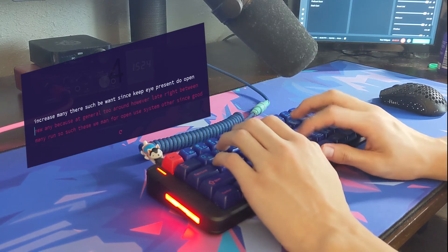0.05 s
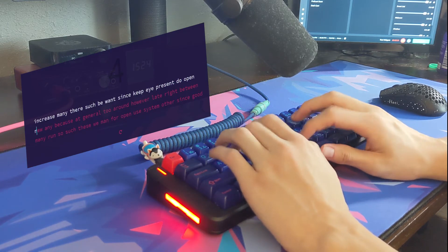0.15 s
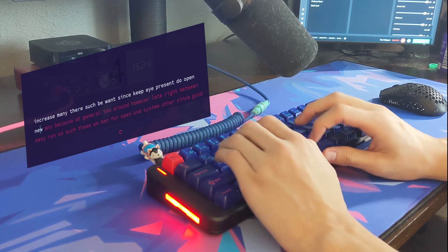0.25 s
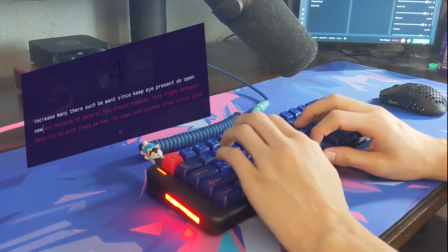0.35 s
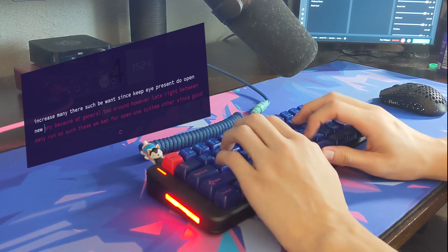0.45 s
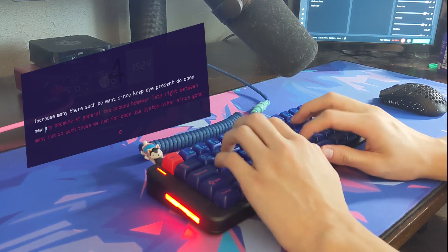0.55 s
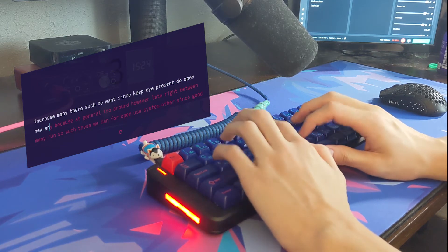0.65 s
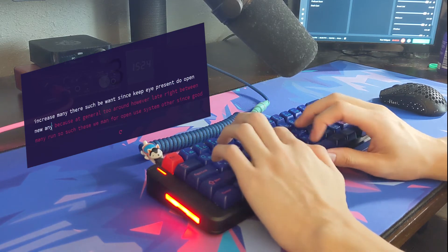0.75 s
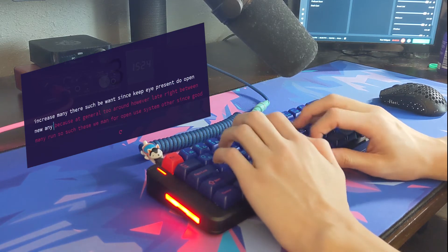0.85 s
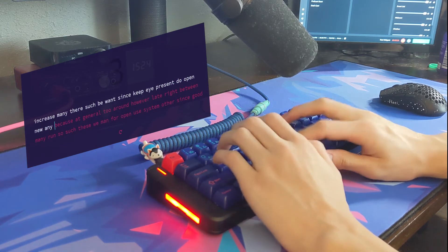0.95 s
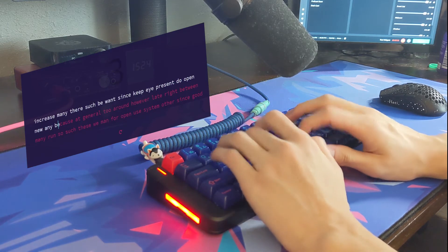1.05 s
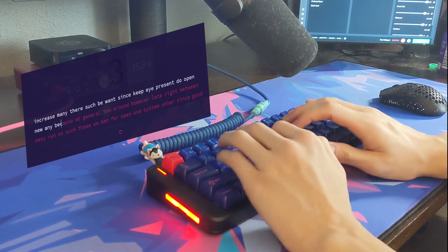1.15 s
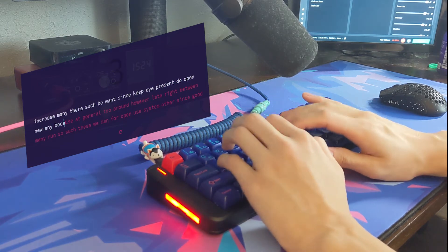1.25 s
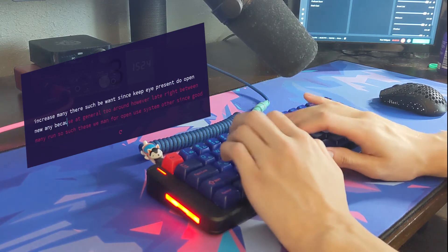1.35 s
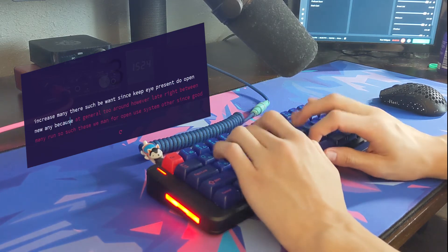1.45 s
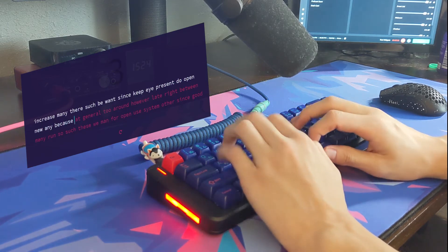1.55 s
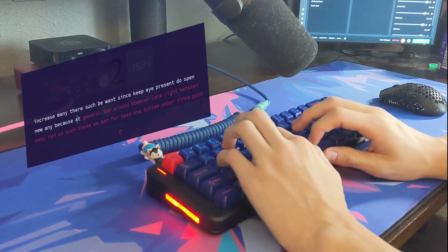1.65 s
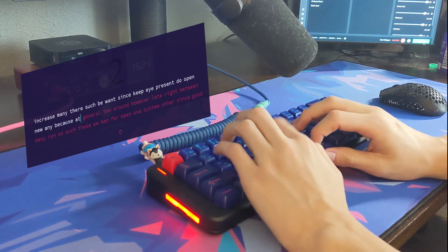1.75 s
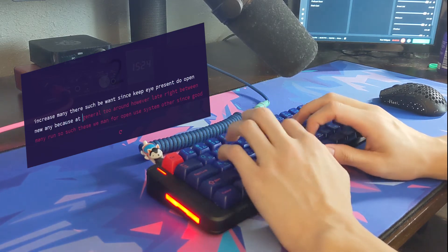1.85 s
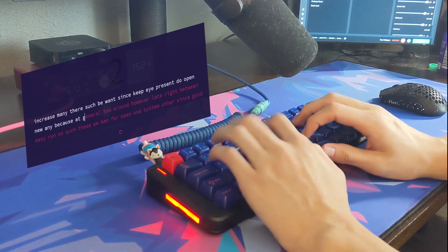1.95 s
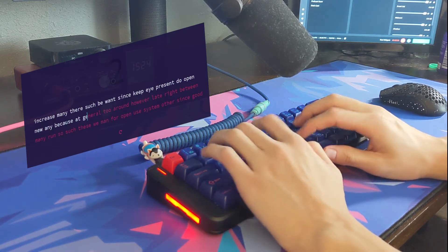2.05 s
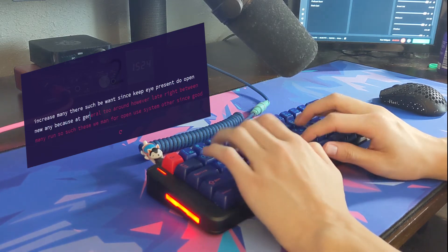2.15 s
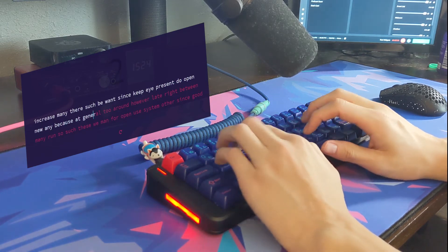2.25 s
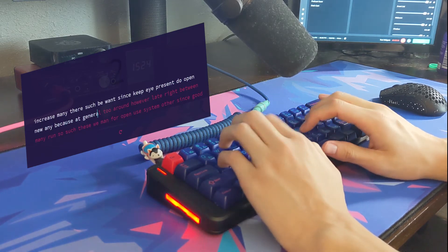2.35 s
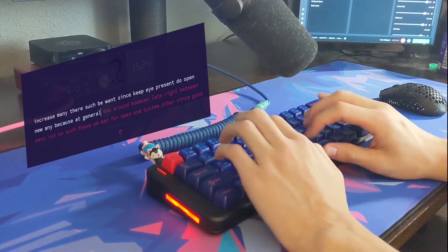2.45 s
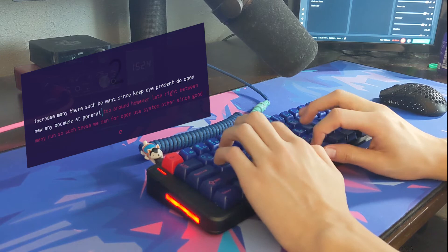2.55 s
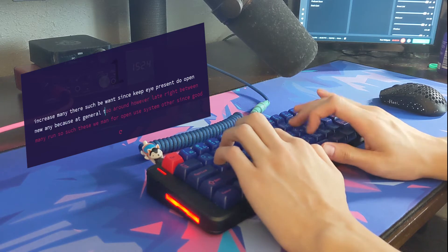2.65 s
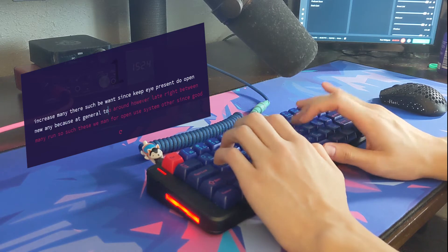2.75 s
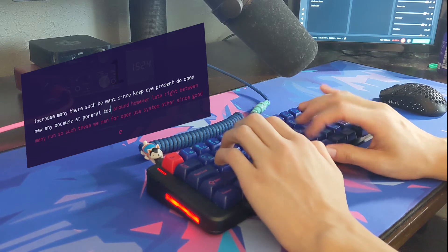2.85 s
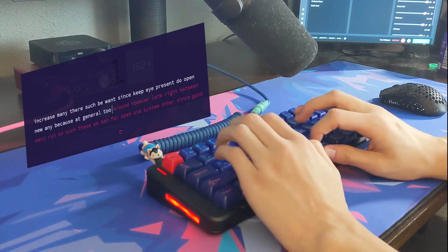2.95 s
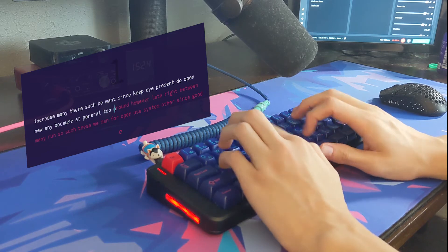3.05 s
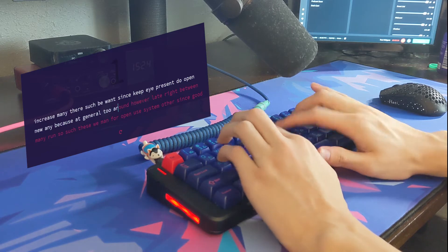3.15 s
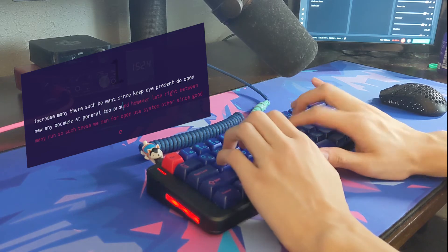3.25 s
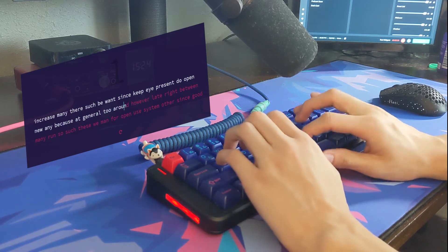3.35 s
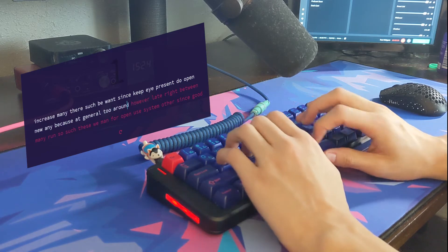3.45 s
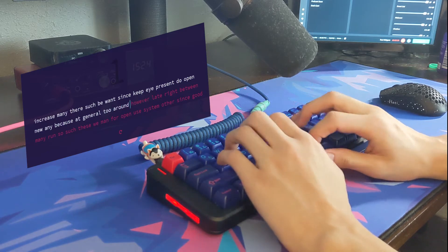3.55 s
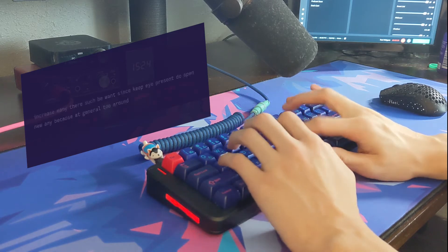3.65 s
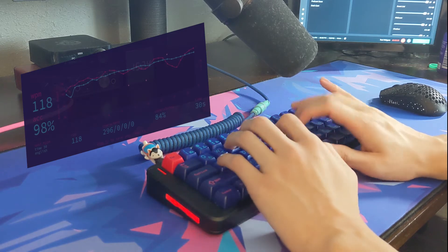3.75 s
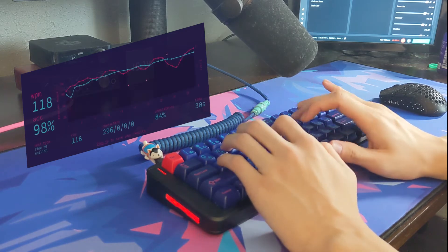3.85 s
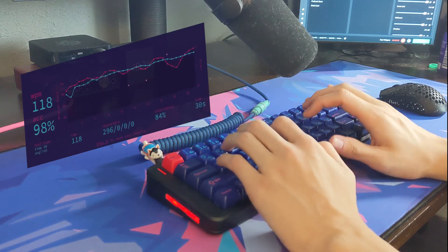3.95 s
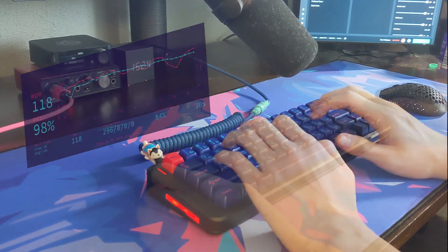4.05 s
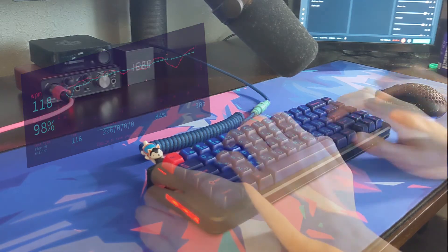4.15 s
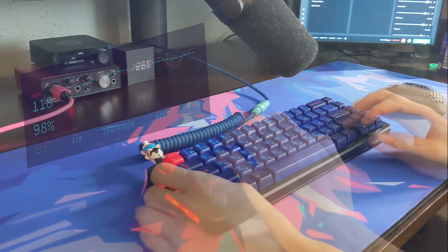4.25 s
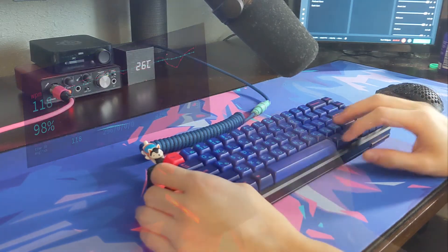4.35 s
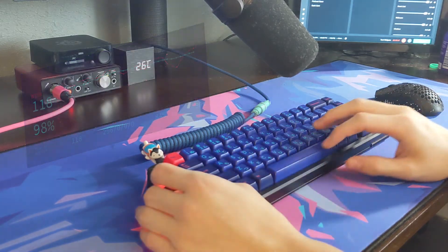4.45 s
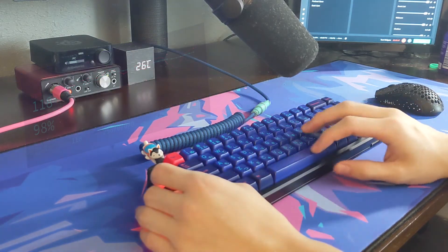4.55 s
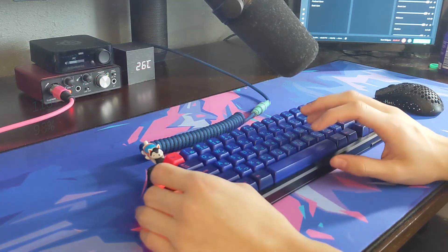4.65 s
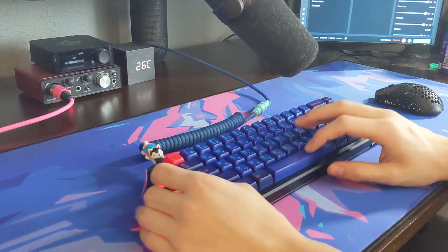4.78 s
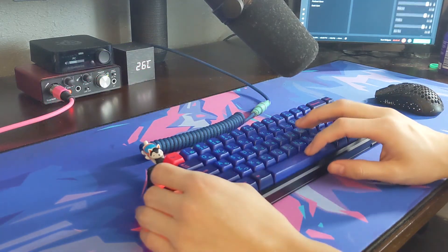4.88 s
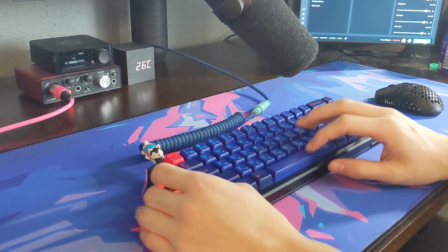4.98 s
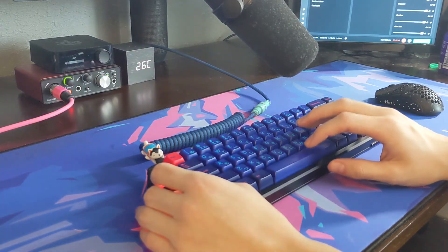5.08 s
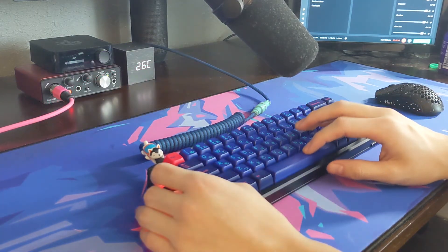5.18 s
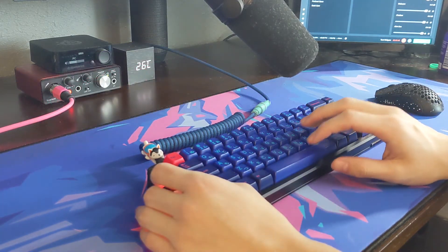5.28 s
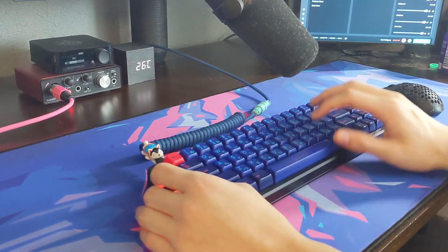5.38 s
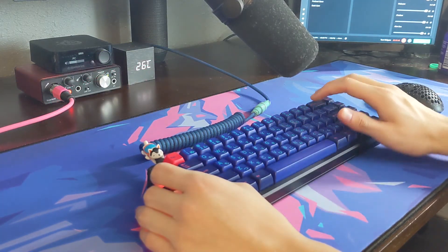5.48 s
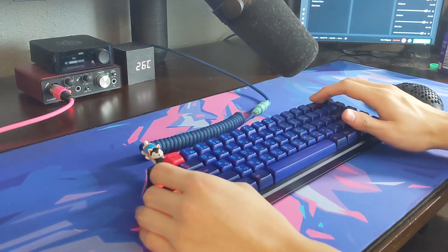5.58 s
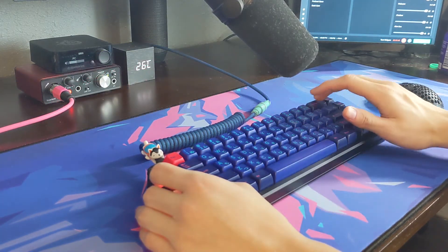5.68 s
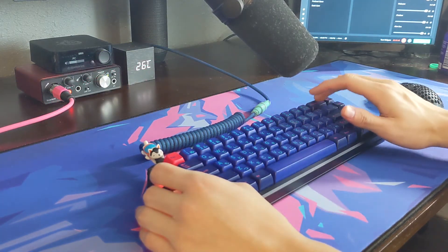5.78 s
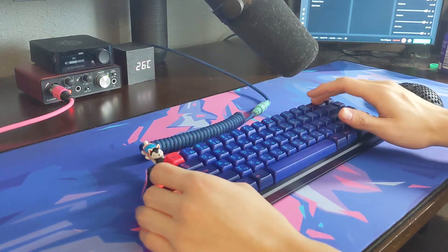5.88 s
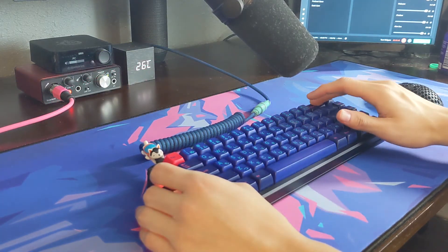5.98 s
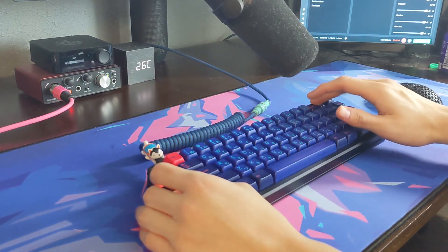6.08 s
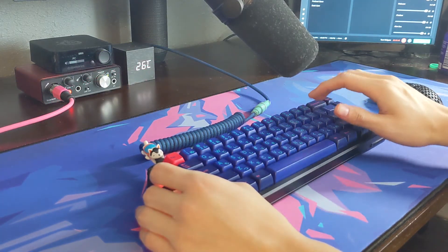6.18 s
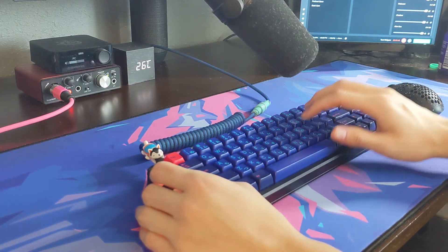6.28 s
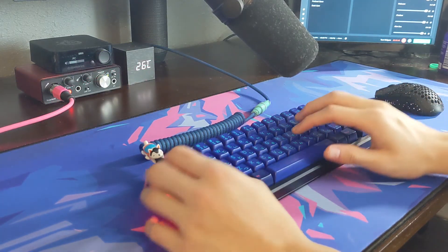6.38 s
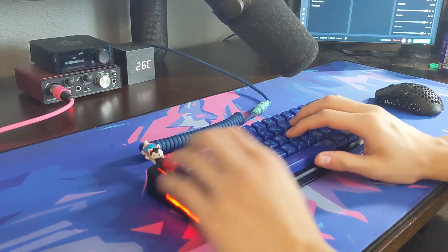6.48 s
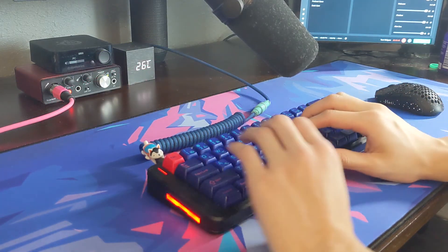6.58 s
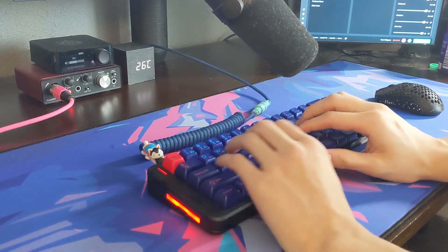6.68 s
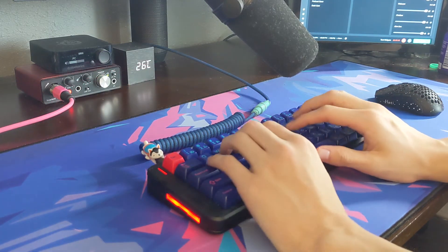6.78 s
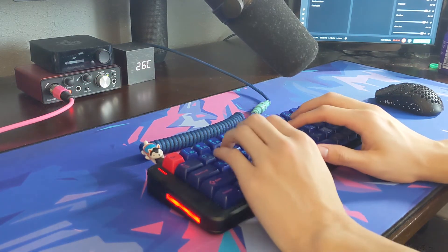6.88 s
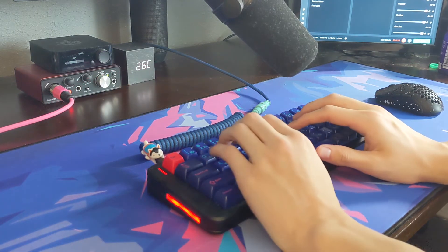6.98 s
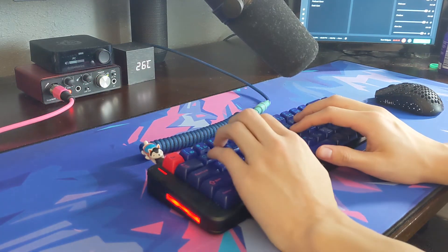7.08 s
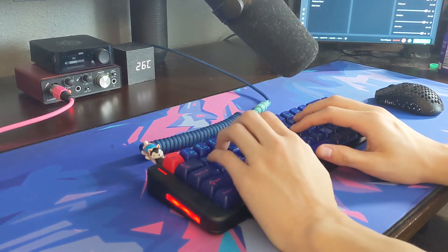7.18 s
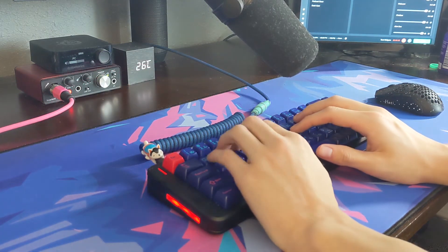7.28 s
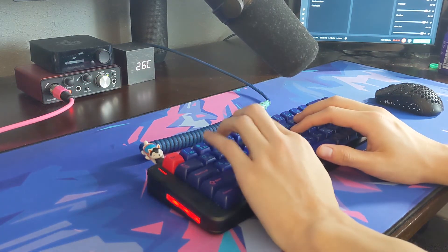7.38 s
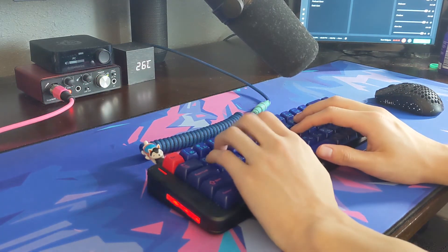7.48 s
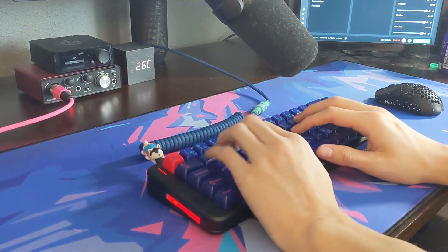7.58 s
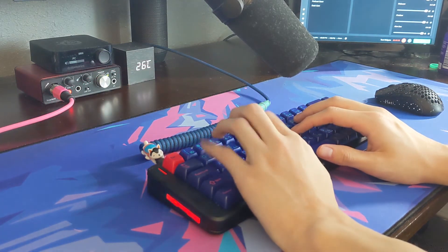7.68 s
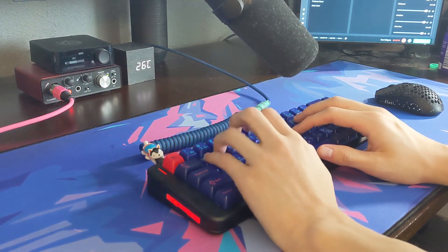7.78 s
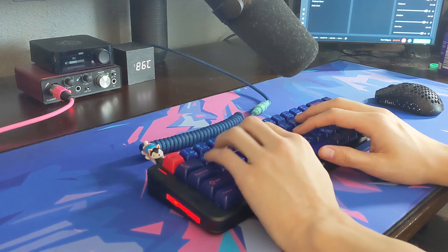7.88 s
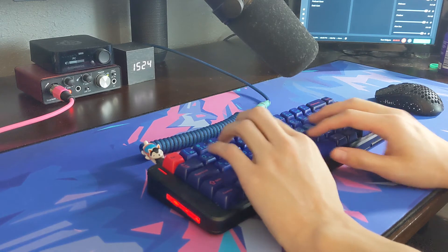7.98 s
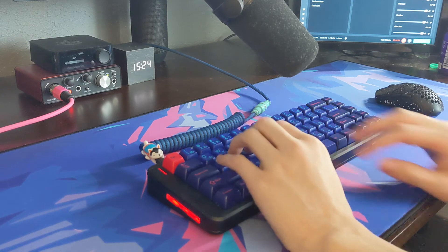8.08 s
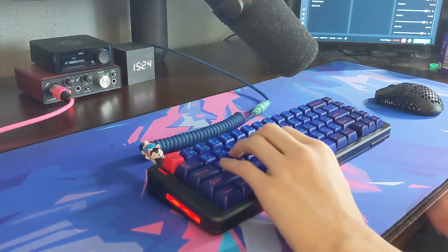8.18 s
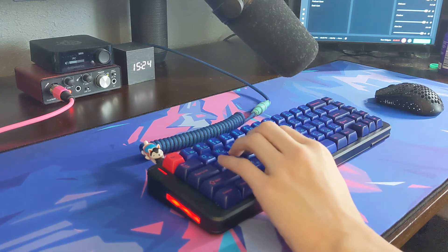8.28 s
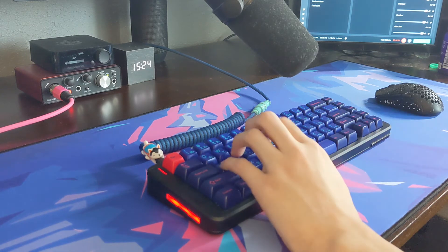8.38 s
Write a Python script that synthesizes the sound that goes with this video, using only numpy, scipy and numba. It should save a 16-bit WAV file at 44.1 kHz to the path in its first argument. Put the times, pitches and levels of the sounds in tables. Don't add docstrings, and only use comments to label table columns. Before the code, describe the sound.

Fast typing on a mechanical keyboard clacks densely with banging space bar strokes, then thins to isolated key tests and light finger drumming in a quiet room.

```python
import sys
import numpy as np
from scipy import signal
from scipy.fft import rfft, irfft, next_fast_len
from scipy.io import wavfile
from scipy.ndimage import uniform_filter1d
from numba import njit

SR = 44100
rng = np.random.default_rng(int(sys.argv[2]) if len(sys.argv) > 2 else 0)


def put_to_file(sound):
    columns = np.atleast_2d(sound).T
    safe = np.clip(columns, -1, 1)
    whole_steps = np.round(safe * 32767)
    wavfile.write(sys.argv[1], SR, whole_steps.astype(np.int16))


def linear_from_db(decibels):
    return 10 ** (np.asarray(decibels, float) / 20)


N = 371763

STEADY = 0.2
TOP_HZ = 16600

# (time [s], knock peak [dB], cap pitch [Hz], tick peak [dB], travel [s])
PRESSES = [(0.5478, -21, 1860, -30.5, 0.0075), (0.8548, -16.5, 1840, -36.5, 0.016),
           (1.2792, -16, 1900, -32, 0.0094), (1.4907, -17, 1860, -32.5, 0.012),
           (1.734, -18, 1650, -34.5, 0.019), (1.8351, -6.5, 2300, -19.5, 0.0061),
           (1.9346, -16.5, 1980, -38.5, 0.0073), (2.012, -14, 1570, -30.5, 0.0048),
           (2.076, -16.5, 1490, -28.5, 0.0098), (2.123, -26.5, 2024, -45, 0.0045),
           (2.511, -15, 1820, -25, 0.0057), (2.6226, -20, 1630, -24.5, 0.0041),
           (2.6941, -20, 1280, -33, 0.035), (2.9237, -19, 2200, -33.5, 0.009),
           (3.116, -19, 1992, -31.5, 0.0034), (3.1909, -16, 1560, -27, 0.005),
           (3.2695, -23.5, 2076, -36.5, 0.0089), (3.6174, -13.5, 1524, -20.5, 0.0073),
           (7.364, -19, 2140, -36.5, 0.012), (7.6992, -17, 2110, -32, 0.0049),
           (7.7564, -27, 1480, -32, 0.0075), (8.2346, -20.5, 1630, -38.5, 0.017)]
# (time [s], knock peak [dB], cap pitch [Hz], tick peak [dB])
FIRST_WORDS = [(.0067, -17.5, 1950, -33), (0.068, -22.5, 1000, -37), (0.1296, -19, 1860, -36.5),
               (0.1597, -27, 2140, -30), (0.3726, -18.5, 1590, -35), (0.414, -25.5, 1900, -42),
               (.4682, -28.5, 2150, -44.5), (0.4798, -21.5, 1910, -39.5), (0.6392, -21, 2030, -36.5),
               (0.8123, -21, 1900, -33.5), (0.8842, -21.5, 2200, -37.5), (0.9374, -18, 2000, -35),
               (0.9904, -35.5, 1270, -60), (1.0522, -20, 1890, -35), (1.0861, -33, 1150, -52.5),
               (1.1394, -23, 1660, -33.5), (1.149, -18.5, 2400, -36), (1.2201, -25, 1900, -37.5),
               (1.225, -20.5, 2070, -38), (1.3462, -26.5, 1940, -39), (1.3614, -23, 2050, -44),
               (1.8001, -20, 2070, -37), (1.8072, -28.5, 2070, -54), (1.94, -17, 2200, -31.5)]
# (time [s], knock peak [dB], cap pitch [Hz], tick peak [dB])
LAST_WORDS = [(2.038, -27.5, 1880, -44), (2.1449, -18, 1268, -32.5), (2.1756, -22, 2100, -41),
              (2.221, -21, 1840, -29.5), (2.2513, -24.5, 1955, -42), (2.2557, -30, 2180, -62),
              (2.302, -20, 1966, -32.5), (2.5383, -18.5, 2150, -32.5), (2.571, -23.5, 1900, -33),
              (2.974, -22, 1870, -39), (2.9956, -20.5, 1980, -35.5), (3.0161, -21, 2166, -40.5),
              (3.0309, -20, 2010, -35.5), (3.081, -23.5, 1960, -34.5), (3.1206, -26.5, 865, -49),
              (3.287, -36.5, 1480, -52), (3.5173, -14, 1300, -25), (3.5827, -21, 1970, -32.5),
              (3.593, -33, 2150, -49.5), (3.6934, -24.5, 1930, -34)]
# (time [s], knock peak [dB], cap pitch [Hz], tick peak [dB])
DRUMMING = [(7.0022, -30, 2200, -44), (7.069, -22.5, 2070, -39), (7.0982, -19.5, 2000, -35),
            (7.146, -22, 2200, -32.5), (7.174, -23.5, 830, -35), (7.1883, -21.5, 2020, -39),
            (7.1969, -20, 2000, -42.5), (7.257, -25.5, 2150, -40), (7.291, -34, 984, -48),
            (7.3064, -31, 2200, -46), (7.334, -25.5, 2200, -43), (7.392, -40, 2300, -44),
            (7.442, -25.5, 1990, -36.5), (7.456, -18, 1970, -46), (7.4622, -25, 2150, -44),
            (7.5018, -25, 2200, -42), (7.5625, -41, 2200, -49.5), (7.5867, -33, 2200, -55),
            (7.65, -24, 2230, -39), (7.7165, -22.5, 2180, -39), (7.768, -18, 1910, -37),
            (7.815, -24, 2160, -42), (8.317, -18.5, 1900, -31.5), (8.3262, -36, 1250, -45),
            (8.3328, -20.5, 1190, -30.5), (8.3907, -25, 1480, -37), (8.4124, -27, 2020, -40),
            (8.4271, -21, 1850, -36)]
# (landing time [s], knock peak [dB], wire tick peak [dB], travel [s], wire tick at first touch [dB])
BAR_DOWN = [(0.1751, -1.5, -29, 0.025, -35), (0.663, 2, -21, .0127, -28), (1.328, -2.5, -33, 0.026, -32.5),
            (1.578, -0.5, -28.5, 0.028, -32), (2.365, 2, -20, 0.014, -27), (2.755, -1.5, -22.5, 0.015, -24),
            (3.3528, 3.5, -19.5, 0.0092, -29), (4.5932, 3, -19.5, 0.01, -27),
            (4.7529, -20.5, -42, 0.022, -31.5), (4.8731, -2.5, -28.5, 0.014, -30.5),
            (5.006, -3.5, -30, 0.014, -31)]
# (time [s], knock peak [dB], wire tick peak [dB])
BAR_RATTLES = [(.282, -26, -40), (.6512, -13, -26), (.748, -23, -38.5), (1.3205, -35, -50),
               (1.5548, -21, -30), (1.5855, -22, -40), (1.665, -26.5, -28), (2.861, -24, -35.5),
               (3.370, -21, -38), (3.388, -33.5, -62), (4.647, -17, -32), (4.7375, -23, -30),
               (4.746, -28, -54), (4.7485, -39, -38), (4.797, -20, -40.5), (4.8903, -45, -43),
               (4.9307, -24, -39), (5.0203, -48, -40)]
# (time [s], knock peak [dB], cap pitch [Hz], tick peak [dB])
WIDE = [(5.454, -49, 1380, -63), (5.502, -32.5, 1210, -48.5), (5.576, -47, 1880, -58),
        (5.5809, -24.5, 1320, -37.5), (5.623, -52, 810, -53), (5.639, -34, 1230, -45.5),
        (5.694, -41, 2500, -47.5), (5.7, -44.5, 3000, -80.5), (5.713, -42, 1590, -55),
        (5.764, -34.5, 770, -40), (5.8133, -43, 844, -56), (5.831, -25.5, 1260, -40),
        (5.8877, -32.5, 1140, -34), (5.934, -43, 2120, -51), (5.9436, -19, 1860, -32.5),
        (5.988, -46, 850, -47), (6.017, -29, 1095, -34)]


def coloured(points):
    hz, db = np.transpose(points)
    bins = np.maximum(np.arange(N // 2 + 1) * SR / N, 1)
    gain = linear_from_db(np.interp(np.log(bins), np.log(hz), db))
    x = irfft(rfft(rng.standard_normal(N)) * gain, N)
    return x / np.std(x)


def walk(rate):
    hold = int(SR / rate)
    steps = np.repeat(rng.standard_normal(N // hold + 1), hold)
    return uniform_filter1d(steps, hold)[:N]


def damped(modes, cycles):
    return [(hz, db, cycles / hz) for hz, db in modes]


@njit
def resonate(force, pole, gain):
    out = np.zeros(force.shape)
    for e in range(len(force)):
        for m in range(pole.shape[1]):
            z = 0j
            for i in range(force.shape[1]):
                z = z * pole[e, m] + force[e, i]
                out[e, i] += gain[e, m] * z.imag
    return out


def strike(s, peak_db, modes, scrape_s, scrape_db, soft_hz, stiff_hz=150, cap=None, alike=0.95, order=1):
    ring = 4000
    spread_db, detune_share = 3.5, 0.03
    hz, db, t60 = (np.tile(c, (len(s), 1)) for c in np.transpose(modes))
    if cap is not None:
        hz, db, t60 = (np.c_[own + 0 * s, rest] for own, rest in zip(cap, (hz, db, t60)))

    chance = rng.standard_normal((len(s), ring + 2 * hz.shape[1]))
    detune, weight = np.split(chance[:, ring:], 2, axis=1)
    scrape_fade = np.exp(-np.arange(ring) / (scrape_s * SR))
    force = linear_from_db(scrape_db) * chance[:, :ring] ** order * scrape_fade
    force[:, 0] += 1

    push = np.diff(force, axis=1, prepend=0) + 1e-18
    band = signal.butter(3, [stiff_hz, min(soft_hz, TOP_HZ)], "bandpass", fs=SR, output="sos")
    push = signal.sosfilt(band, push)

    turn = 2j * np.pi * hz * (1 + detune_share * alike * detune) / SR
    pole = np.exp(turn - np.log(1000) / (t60 * SR))
    gain = linear_from_db(db + spread_db * alike * weight) / np.abs(1 - pole)
    rings = resonate(push, pole, gain)
    rings *= (linear_from_db(peak_db) / np.abs(rings).max(axis=1))[:, None]
    out = np.zeros(N + ring)
    np.add.at(out, (s * SR).astype(int)[:, None] + np.arange(ring), rings)
    return out[:N]


def still_air():
    # (frequency [Hz], level per Hz [dB])
    air_colour = [(20, 10), (55, -28), (130, -14.5), (190, -21), (290, -16.5), (400, -29), (520, -25),
                  (800, -28.5), (1740, -37.5), (4000, -51), (6500, -54), (13500, -49.5), (16000, -43),
                  (17000, -49.5)]
    return coloured(air_colour) * linear_from_db(-47.5 + 0.8 * walk(6.2))


def shaking():
    # (start [s], end [s], level at start [dB], level at end [dB])
    spells = [
        (-.2, 0.23, -33, -40.5),
        (0.297, 1.4, -45, -41.5),
        (1.5, 1.91, -38, -42),
        (1.95, 3.7, -36.5, -40),
        (3.125, 3.565, -46, -36),
        (4.6, 5.003, -46, -37.5),
        (5.535, 6.013, -42.5, -40.5),
        (6.1, 6.45, -50.5, -53),
        (7.05, 8.2, -40, -49),
        (8.276, 8.405, -46.5, -36),
    ]
    rise_db_s, fall_db_s = 180.5, 81
    t, db = np.arange(N) / SR, -56
    for start, end, start_db, end_db in spells:
        before = rise_db_s * np.maximum(start - t, 0)
        after = fall_db_s * np.maximum(t - end, 0)
        db = np.maximum(db, np.interp(t, [start, end], [start_db, end_db]) - before - after)
    return linear_from_db(db)


def desk_shudder():
    # (frequency [Hz], level per Hz [dB])
    desk_colour = [(8, 2), (14, -7), (28, 4), (50, -2), (75, -23.5), (110, -25), (200, -61.5)]
    return coloured(desk_colour) * shaking()


def blows():
    return np.r_[np.array(PRESSES)[:, :-1], FIRST_WORDS, LAST_WORDS, DRUMMING].T


def contacts():
    # (time [s], knock peak [dB], cap pitch [Hz], tick peak [dB])
    nudges = [(3.825, -50.5, 2260, -70), (3.868, -47.5, 1000, -78), (5.385, -36, 2570, -41.5),
              (6.3973, -49, 1220, -76.5), (6.568, -46.5, 1260, -57.5), (6.6, -51, 1300, -69),
              (6.6776, -46.5, 2280, -75), (6.7114, -52, 1560, -48.5), (6.7153, -52, 1200, -55),
              (8.04, -47, 910, -75), (8.095, -48, 820, -74), (8.1863, -52, 2350, -53),
              (8.358, -52, 1260, -52)]
    # (time [s], knock peak [dB], cap pitch [Hz], tick peak [dB])
    bounces = [(.118, -41, 2000, -63), (.3037, -56, 2000, -64), (.3297, -58, 2000, -71),
               (.34, -49.5, 2000, -67), (.4003, -55, 2100, -56.5), (0.625, -57, 2100, -55),
               (0.704, -53, 1900, -66), (.803, -50, 2010, -56), (1.0294, -44.5, 1900, -66),
               (1.0742, -52, 1800, -66.5), (1.126, -40.5, 2000, -52.5), (1.2103, -42, 2000, -56.5),
               (1.4052, -52, 1800, -68), (1.4175, -37, 1900, -48), (1.713, -52, 2000, -52),
               (1.768, -48.5, 1900, -60), (1.783, -44.5, 1900, -68), (2.113, -48, 2100, -55.5),
               (2.1926, -46, 2000, -65), (2.5304, -50, 2100, -44), (2.5512, -46, 2100, -56),
               (2.585, -39, 2100, -53), (2.6413, -44, 2000, -60), (2.714, -45, 1800, -64),
               (3.1276, -38.5, 1200, -47.5), (3.133, -37, 900, -56), (3.274, -25, 1140, -41.5),
               (3.569, -52, 2000, -69), (5.565, -46, 2020, -53), (5.61, -45, 1800, -66),
               (6.776, -56, 2300, -81), (6.9456, -63, 1510, -79), (7.031, -47, 2200, -60),
               (7.1208, -48, 2200, -48), (7.319, -41, 2200, -50), (7.404, -46, 2200, -60),
               (7.422, -39.5, 2200, -57), (7.4636, -27, 2000, -45), (7.7238, -51, 2200, -45),
               (8.3286, -27, 1200, -53)]
    s, _, _, _, travel = np.transpose(PRESSES)
    knock_scatter, tick_scatter = 5.5 * rng.standard_normal((len(s), 2)).T
    touch = np.c_[s - travel, -42 + knock_scatter, 1420 + 0 * s, -47.5 + tick_scatter]
    return np.r_[blows().T, nudges, bounces, touch].T


def letters():
    # (frequency [Hz], level [dB])
    plate_modes = [(400, -15.5), (800, -13), (1060, -9), (1240, -8), (1500, -5.5), (1780, -8), (2080, -5.5),
                   (2600, -22.5), (3100, -17), (3700, -12.5)]
    # (frequency [Hz], level [dB], t60 [s])
    stem_modes = [(3690, 29, 0.0025), (3940, 17, 0.00078), (5820, 9.5, 0.011), (9290, 29.5, 0.00042),
                  (11650, 19, 0.0022), (13940, -4, 0.0043)]
    s, knock_db, cap_hz, tick_db = contacts()
    firm = np.arange(len(s)) < len(PRESSES)
    light = ~firm
    plate = damped(plate_modes, cycles=10)
    knock = strike(s[firm] + 0.00025, knock_db[firm], plate, 0.0021, -17.5, soft_hz=3920, stiff_hz=650,
                   cap=(cap_hz[firm], 3.0, 0.006), alike=0.93)
    knock += strike(s[light] + 0.00024, knock_db[light], plate, 0.0031, -18.5, soft_hz=3140, stiff_hz=399.7,
                    cap=(cap_hz[light], 2.5, 0.0085), alike=0.17)
    tick = strike(s, tick_db + 3.5, stem_modes, 0.0016, -12.5, soft_hz=13100, alike=0.6)
    return knock + tick


def snaps():
    # (frequency [Hz], level [dB], t60 [s])
    snap_modes = [(2300, -1.5, 0.00059), (3200, 4, 0.0012), (4300, -11.5, 0.00047)]
    # (frequency [Hz], level [dB], t60 [s])
    case_modes = [(116, -2, 0.046), (200, 2.5, 0.026), (312, -2.5, 0.031)]
    s, knock_db, _, tick_db = blows()
    snap = strike(s + 0.0002, tick_db + 4, snap_modes, 0.00064, -21.0, soft_hz=6400, stiff_hz=900)
    thud = strike(s, knock_db - 30, case_modes, 0.006, -16.0, soft_hz=486, stiff_hz=70)
    return snap + thud


def scattered(x):
    low = signal.butter(2, 153, fs=SR, output="sos")
    flutter = signal.sosfilt(low, rng.standard_normal(N))
    phase = 1.3 * flutter / np.std(flutter)
    return np.real(signal.hilbert(x, next_fast_len(N))[:N] * np.exp(1j * phase))


def room(x):
    # (centre frequency [Hz], level [dB], t60 [s])
    room_bands = [(277, -24.5, 0.23), (843, -24, 0.19), (1300, -31.5, 0.34), (2200, -30.5, 0.17),
                  (3900, -30, 0.3), (6500, -31, 0.36), (10830, -38.5, 0.4)]
    early_t60 = 0.035
    t = np.arange(SR // 3) / SR
    answer = 0
    for hz, db, t60 in room_bands:
        band = signal.butter(2, [hz / 1.35, hz * 1.35], "bandpass", fs=SR, output="sos")
        fade = linear_from_db(db - 60 * t / t60) + linear_from_db(db + 4.5 - 60 * t / early_t60)
        onset = np.clip(t / 0.004, 0, 1)
        answer = answer + signal.sosfilt(band, rng.standard_normal(len(t)) * fade * onset)
    return signal.fftconvolve(x, answer)[:N]


def bar_contacts():
    # (time [s], first knock [dB], gap [s], second knock [dB], wire tick peak [dB])
    bar_up = [(.26, -10, .0054, -20, -30), (0.722, -7.5, 0.01, -11, -24), (1.4357, -22, 0.0079, -13, -32.5),
              (1.655, -12, 0.0083, -15.5, -31.5), (2.443, -8, 0.01, -14, -23), (2.8434, -8, 0.01, -18, -29),
              (3.4305, -7.5, 0.0091, -11, -21.5), (4.6408, -13.5, 0.014, -50, -36),
              (4.783, -12, 0.0074, -18, -29), (4.9203, -7, 0.0076, -25, -29),
              (5.0578, -13, 0.005, -26, -28)]
    s, knock_db, tick_db, travel, touch_db = np.transpose(BAR_DOWN)
    up, first_db, gap, second_db, wire_db = np.transpose(bar_up)
    touch = np.c_[s - travel, -36 + 0 * s, touch_db]
    slap = np.c_[s - 0.91 * travel, -28.5 + 0 * s, touch_db - 6]
    landing = np.c_[s, knock_db, tick_db]
    first_end = np.c_[up, first_db, wire_db]
    second_end = np.c_[up + gap, second_db, wire_db - 4]
    settling = np.c_[up + gap + 0.0073, np.minimum(second_db, -30), wire_db - 13]
    return np.r_[touch, slap, landing, first_end, second_end, settling, BAR_RATTLES].T


def plate_rings():
    # (time [s], peak [dB], pitch [Hz])
    ring_events = [(0.068, -41, 1060), (0.16, -25, 799), (0.259, -23, 1300), (0.372, -26.5, 1340),
                   (0.639, -28, 1260), (0.721, -34, 1250), (0.937, -35, 1100), (1.052, -24, 1190),
                   (1.14, -27.5, 980), (1.221, -21.5, 1000), (1.279, -25, 770), (1.653, -24, 1260),
                   (1.835, -11, 1256), (1.934, -30, 1070), (2.011, -25, 1120), (2.076, -25.5, 1180),
                   (2.144, -25, 1200), (2.22, -21, 1240), (2.301, -26, 1120), (2.354, -27, 1300),
                   (2.441, -28, 1220), (2.51, -19, 1260), (2.621, -16, 1340), (2.696, -23.5, 1280),
                   (2.739, -27, 1410), (2.842, -27, 1300), (2.923, -29, 800), (3.117, -28.5, 826),
                   (3.19, -31.5, 1270), (3.269, -29.5, 1180), (3.351, -18.5, 860), (3.43, -26, 1270),
                   (3.518, -16, 1240), (3.616, -34, 1260), (4.591, -31.5, 1420), (4.641, -16, 1330),
                   (4.782, -14, 1260), (4.918, -38, 1280), (5.058, -22, 1300), (5.583, -35, 1170),
                   (5.832, -41, 1200), (5.943, -20, 1200), (6.019, -39, 1136), (7.002, -29, 830),
                   (7.069, -40, 1060), (7.098, -25, 800), (7.147, -29, 1200), (7.174, -42, 1080),
                   (7.334, -26, 1080), (7.441, -22.5, 800), (7.649, -24, 1180), (7.699, -31, 1110),
                   (7.754, -27, 1043), (8.234, -25, 1230), (8.317, -24, 1160), (8.39, -44, 1170)]
    s, peak_db, ring_hz = np.transpose(ring_events)
    hits = np.r_[blows()[0], bar_contacts()[0], np.transpose(WIDE)[0]]
    nearest = np.abs(s[:, None] - hits).argmin(axis=1)
    return strike(hits[nearest] + 0.00055, peak_db - 7.5, [(587, -26.5, 0.007)], 0.0035, -20.0,
                  soft_hz=1900, stiff_hz=445.3, cap=(ring_hz, 0, 0.013), alike=STEADY)


def space_bar():
    # (frequency [Hz], level [dB], t60 [s])
    body_modes = [(799, 4.5, 0.062), (1000, -13.5, 0.0081), (1229, -13.5, 0.046), (1480, -8.5, 0.014),
                  (1700, 3.5, 0.008), (1870, 7, 0.009), (2027, 3.5, 0.028)]
    # (frequency [Hz], level [dB], t60 [s])
    rising_modes = [(816, -12, 0.065), (1000, -19.5, 0.013), (1260, -8.5, 0.063), (1590, -2.5, 0.048),
                    (1860, 1.5, .011), (2050, 5, 0.03), (2388, -20.5, .04), (2930, -12, .04)]
    # (frequency [Hz], level [dB])
    hollow_modes = [(110, -10), (240, -11), (320, 6.5), (395, 9.5), (520, -13.5), (640, -4.5)]
    # (frequency [Hz], level [dB], t60 [s])
    wire_modes = [(2980, -8.5, 0.0044), (3720, -6, 0.0039), (4450, -1, 0.00088), (5770, -12.5, 0.016),
                  (6470, -9, 0.0047), (8440, -2, 0.001), (10970, -2, 0.0028), (12150, -1.5, 0.0052),
                  (14300, -9, 0.0047)]
    s, knock_db, tick_db = bar_contacts()
    down = np.arange(len(s)) < 3 * len(BAR_DOWN)
    up = ~down
    knock = strike(s[down], knock_db[down] - 7.0, body_modes, 0.0015, -23.5,
                   soft_hz=2150, stiff_hz=1200, alike=STEADY)
    knock += strike(s[up], knock_db[up] - 7.5, rising_modes, 0.006, -25.5,
                    soft_hz=2300, stiff_hz=900, alike=0.13)
    knock = signal.sosfilt(signal.butter(4, 2320, fs=SR, output="sos"), knock)

    thump_db = -26.5 + 0.97 * np.minimum(knock_db + 10.0, 0)
    thump = strike(s, thump_db, damped(hollow_modes, cycles=10), 0.0048, -17.5, soft_hz=1178, stiff_hz=93.0)

    dry_tick = down | (np.arange(len(s)) >= len(s) - len(BAR_RATTLES))
    chatter = ~dry_tick
    wire = strike(s[dry_tick], tick_db[dry_tick] + 3.0, wire_modes, 0.0036, -10, soft_hz=11600, alike=0.68)
    wire += strike(s[chatter], tick_db[chatter] + 4.0, wire_modes, 0.0065, -13,
                   soft_hz=12500, alike=0.6, order=3)
    return knock + thump + wire


def stroke(start, fastest, end, peak_db):
    away = np.interp(np.arange(N) / SR, [start, fastest, end], [1, 0, 1], left=1.6, right=1.6)
    return linear_from_db(peak_db - 20.5 * away ** 1.1)


def hand_brushes():
    # (start [s], fastest [s], end [s], rub peak [dB], hiss peak [dB])
    mat_strokes = [
        (3.799, 4.05, 4.22, -65, -64.5),
        (4.118, 4.299, 4.42, -70, -74),
        (6.343, 6.44, 6.6, -67.5, -73),
        (6.482, 6.57, 6.6, -71.5, -75),
        (6.673, 6.72, 6.84, -72, -73.5),
        (7.88, 7.998, 7.75, -70, -72),
        (7.694, 7.86, 7.96, -61.5, -62),
    ]
    # (frequency [Hz], level [dB])
    rub_colour = [(700, -38), (1250, 0.5), (2000, -6), (3200, -2), (4600, -6.5), (6000, -33)]
    # (frequency [Hz], level [dB])
    hiss_colour = [(4200, -18), (5800, 0.5), (6900, -2), (8600, -0.5), (10500, -6.5), (12200, -4.5),
                   (13600, -10), (15500, -21)]
    out = np.zeros(N)
    for column, colour in ((3, rub_colour), (4, hiss_colour)):
        strokes = sum(stroke(*row[:3], row[column]) for row in mat_strokes)
        unevenness = linear_from_db(2.0 * walk(22) + 1.8 * walk(90))
        out += coloured(colour) * uniform_filter1d(strokes, size=1500) * unevenness
    return out


def wide_key():
    # (frequency [Hz], level [dB], t60 [s])
    body_modes = [(279.2, -16, 0.014), (417, -8.5, 0.039), (800, -8, 0.018), (1203, -8, 0.057),
                  (1690, 6.5, 0.0044), (2500, -9, 0.0011)]
    # (frequency [Hz], level [dB], t60 [s])
    ring_modes = [(4300, -22, .07), (4360, -2, 0.025), (4400, -15, 0.094), (5850, -29, .07)]
    # (frequency [Hz], level [dB], t60 [s])
    wire_modes = [(6200, -10, 0.0022), (7470, 0, 0.0033), (9900, -0.5, 0.0019), (11400, -3, 0.0061),
                  (11320, -27, 0.04), (14500, -3, 0.0057)]
    s, knock_db, cap_hz, tick_db = np.transpose(WIDE)
    knock = strike(s, knock_db + 3.5, body_modes, 0.0036, -17.0, soft_hz=4230,
                   cap=(cap_hz, 0, 0.009), alike=STEADY)
    ring = strike(s, np.minimum(tick_db, -40) + 1.5, ring_modes, 0.0024, -5, soft_hz=7000, alike=STEADY)
    wire = strike(s, tick_db + 3.0, wire_modes, 0.0027, -8.0, soft_hz=15000)
    return knock + ring + wire


def scene():
    keys = letters() + plate_rings() + space_bar() + wide_key()
    answer = linear_from_db(-18.0) * room(scattered(keys))
    return (keys + snaps() + answer + desk_shudder() + hand_brushes() + still_air())[None]


def low_pass(x):
    return signal.sosfilt(signal.butter(12, 16670, fs=SR, output="sos"), x)


def record(dry):
    capsule = signal.butter(4, 13700, fs=SR, output="sos")
    top = signal.ellip(10, 0.2, 70, TOP_HZ, fs=SR, output="sos")
    mix = signal.sosfilt(np.r_[capsule, top], dry)
    return low_pass(mix)


dry = scene()
out = record(dry)
put_to_file(out)
```